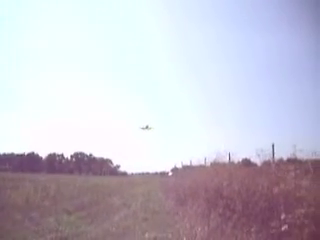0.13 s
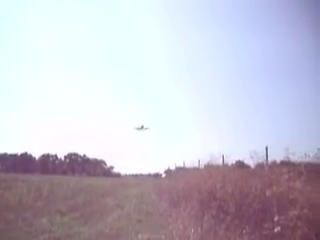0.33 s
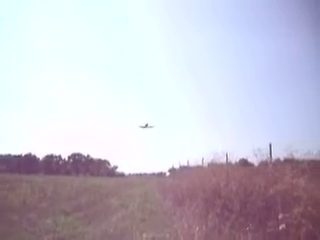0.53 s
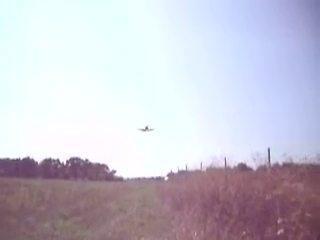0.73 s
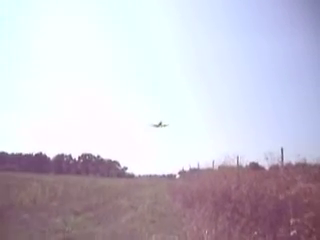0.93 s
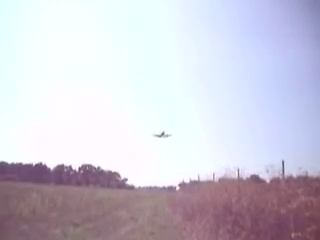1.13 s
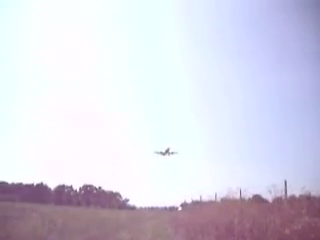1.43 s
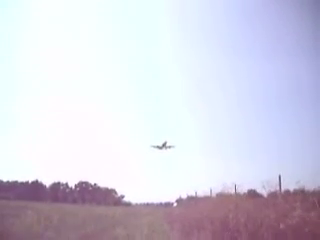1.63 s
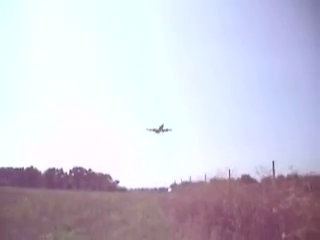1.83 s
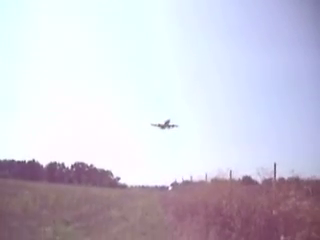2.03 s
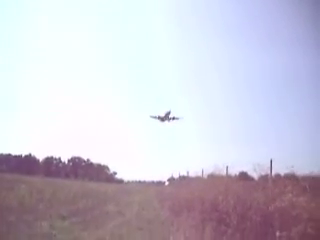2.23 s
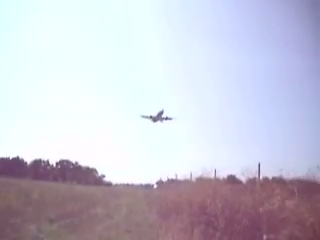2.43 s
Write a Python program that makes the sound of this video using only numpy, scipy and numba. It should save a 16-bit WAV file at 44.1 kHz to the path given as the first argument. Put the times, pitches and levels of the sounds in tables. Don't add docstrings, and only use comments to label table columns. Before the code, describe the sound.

A jet airliner's harsh, broadband roar comes closer over open grass, rumbling and howling, finally distorting.

```python
import sys
import numpy as np
from scipy import signal
from scipy.fft import rfft, irfft
from scipy.io import wavfile
from scipy.ndimage import uniform_filter1d, map_coordinates
from numba import njit

SR = 44100
rng = np.random.default_rng(int(sys.argv[2]) if len(sys.argv) > 2 else 0)


def magnitude_from_level(level_db):
    exponent = np.asarray(level_db, float) / 20
    return 10 ** exponent


def unload_wav(signal):
    wavfile.write(
        sys.argv[1],
        SR,
        np.round(np.clip(np.atleast_2d(signal).T, -1, 1) * 32767).astype(np.int16),
    )


N = 114660


@njit
def resonance(x, hz, width):
    y, swing, store = np.empty(len(x)), 0., 0.
    for i in range(len(x)):
        g = np.tan(np.pi * hz[i] / SR)
        damping = width / hz[i]
        v = (swing + g * (x[i] - store)) / (1 + g * (g + damping))
        swing = 2 * v - swing
        store = store + 2 * g * v
        y[i] = damping * v
    return y


def unit(x):
    return x / np.sqrt(np.mean(x ** 2))


def curve(table, col):
    rows = np.array(table, float)
    return np.interp(np.arange(N) / SR, rows[:, 0], rows[:, col])


def walk(rate):
    hold = int(SR / rate)
    levels = np.repeat(rng.standard_normal(N // hold + 1), hold)
    smooth = uniform_filter1d(uniform_filter1d(levels, hold), hold)
    return 1.3 * smooth[:N]


def band(hz, width):
    x = rng.standard_normal(N)
    for _ in range(2):
        x = resonance(x, hz + np.zeros(N), 1. * width)
    return unit(x)


def coloured(points):
    p = np.array(points, float)
    f = np.arange(N // 2 + 1) * SR / N + 1e-9
    db = np.interp(np.log(f), np.log(p[:, 0]), p[:, 1], left=-200, right=-200)
    return rfft(rng.standard_normal(N)) * magnitude_from_level(db), f


def above(x, hz, width):
    f = np.arange(N // 2 + 1) * SR / N
    return irfft(rfft(x) * np.clip((f - hz) / width + .5, 0, 1), N)


# [t/s, roar level/dB,
# rumble level/dB, treble tilt of the air/dB per octave, howl level/dB, hiss level/dB, low body level/dB]
APPROACH = [(0, -13.5, -21.5, -4.5, -24.5, -34, -8), (.18, -17.5, -22.5, -1.5, -24.5, -37, -4.5),
            (.28, -20.5, -21, 1.5, -27.5, -36, 2.5), (.45, -21, -21.5, -0.5, -33.5, -44, -2),
            (.7, -23.5, -23, 0, -28, -38, 0), (.9, -21, -21.5, 1.5, -26, -43.5, 0),
            (1.1, -22.5, -19.5, 1, -27, -37, 1.5), (1.3, -20.5, -20, 3.5, -31.5, -37, 2.5),
            (1.5, -20.5, -18, 1, -34, -60.5, -4), (1.7, -23, -18, 5, -42, -41.5, 11),
            (1.9, -23.5, -16, 3.56, -36, -29.5, 8), (2.1, -20.5, -16.5, -0.5, -33, -29.5, 1.5),
            (2.3, -20.5, -16, 1, -35, -27.5, 6.5), (2.45, -19, -16, 1, -28, -25, 4),
            (2.6, -14.5, -14.5, 5.5, -31.5, -17.5, 14)]
# [f/Hz, level/dB per Hz]
ROAR_COLOUR = [(120, -34), (200, -11), (363, -5.5), (775, -8), (946, -1.5), (1900, -5.5), (2860, -12),
               (3400, -18), (3900, -19.5), (5070, -51), (8580, -120)]
TILT_HZ, BODY_HZ = 1620, 840
SHIMMER_DB, FLICKER_DB = .7, .6


def roar():
    spectrum, f = coloured(ROAR_COLOUR)
    tilt, body = curve(APPROACH, col=3), curve(APPROACH, col=6)
    out = 0
    for step in np.arange(-10, 6):
        slice_shape = np.clip(1 - np.abs(3 * np.log2(f / TILT_HZ) - step), 0, 1)
        centre_hz = TILT_HZ * 2 ** (step / 3)
        db = tilt * step / 3 + body / (1 + (centre_hz / BODY_HZ) ** 6)
        db = db + SHIMMER_DB * walk(0.83) + FLICKER_DB * walk(12)
        out = out + irfft(spectrum * slice_shape, N) * magnitude_from_level(db)
    return unit(out) * magnitude_from_level(curve(APPROACH, col=1))


# [f/Hz, level/dB per Hz]
RUMBLE_COLOUR = [(13, -36), (22, -18), (54, -3), (118, 2), (211, -7.5), (253, -9.5), (320, -17),
                 (420, -46.5), (700, -120)]


def rumble():
    spectrum, _ = coloured(RUMBLE_COLOUR)
    return unit(irfft(spectrum, N)) * magnitude_from_level(curve(APPROACH, col=2))


def gear_howl():
    hz = 1010 * (1 + 0.025 * walk(2.1))
    return band(hz, 150) * magnitude_from_level(curve(APPROACH, col=4) - 2.5)


# [t/s, centre f/Hz, level/dB]
SLATS = [
    (0, 1900, -23.5),
    (.18, 1900, -32.5),
    (.4, 1930, -46.5),
    (1.8, 1730, -48),
    (2.1, 1640, -41.5),
    (2.3, 1543, -26),
    (2.45, 1346, -21),
    (2.6, 1380, -23),
]


def slat_howl():
    return band(curve(SLATS, col=1), 420) * magnitude_from_level(curve(SLATS, col=2))


# [f/Hz, level/dB, width/Hz]
FAN = [
    (548, -40.5, 55),
    (1063, -36, 16),
    (1600, -43, 33),
    (3490, -55, 42),
]
FAN_SAG_PER_S, FAN_CHANGE_DB_PER_S = 0.0026, -2.5


def fan_tones():
    t = np.arange(N) / SR - 1.3
    out = 0
    for hz, db, width in FAN:
        tone = band(hz * (1 - FAN_SAG_PER_S * t), width)
        out = out + tone * magnitude_from_level(db + FAN_CHANGE_DB_PER_S * t + 0.5 * walk(6.1))
    return out


def inlet_hiss():
    hz = 3250 * (1 + 0.0083 * walk(2.2))
    return band(hz, 710) * magnitude_from_level(curve(APPROACH, col=5) + 0.52 * walk(10))


# [t/s, lag of the lows off soil/ms, their share/0-1,
# lag of the highs off grass tops/ms, their share/0-1]
GROUND = [(0, 0.45, .1, 0.74, 0.083), (.3, .67, .2, .67, 0.25), (.6, .68, .35, .69, 0.54),
          (.9, 0.75, .4, .69, 0.45), (1.15, .74, 0.5, .68, 0.7), (1.35, 0.83, 0.4, .68, 0.55),
          (1.5, 0.78, .6, 0.82, 0.17), (1.7, 0.82, .65, .8, 0.19), (1.9, 0.81, 0.5, .87, 0.49),
          (2.15, .9, 0.6, .93, 0.51), (2.35, 0.82, .5, .98, 0.34), (2.6, .93, 0.3, 1.06, 0.3)]
GRASS_HZ = 1740


def ground_echo(jet):
    wobble = 1 + .01 * walk(6)

    def late(col):
        lag = curve(GROUND, col) * wobble * SR / 1000
        return map_coordinates(jet, [np.arange(N) - lag], mode="mirror")

    soil, tops = late(col=1), late(col=3)
    low_share = np.clip(curve(GROUND, col=2), 0, .95)
    high_share = np.clip(curve(GROUND, col=4), 0, .95)
    lows = soil - above(soil, GRASS_HZ, 700)
    return low_share * lows + high_share * above(tops, GRASS_HZ, 600)


# [t/s, level of the very top/dB]
TOP_LEVEL = [
    (0, 3.5),
    (.45, 3.5),
    (.72, -6),
    (1.0, 2),
    (1.25, -7),
    (1.47, -16),
    (1.65, 7),
    (2.6, 1),
]


def vary_top(x):
    return x + (magnitude_from_level(curve(TOP_LEVEL, col=1)) - 1) * above(x, 3740, 500)


def scene():
    jet = roar()
    heard = jet - ground_echo(jet) + rumble() + gear_howl() + slat_howl() + fan_tones() + inlet_hiss()
    return vary_top(heard)[None]


# [t/s, level/dB, top f/Hz]
TICKS = [(2.0172, -20, 3800), (2.0208, -16.5, 17000), (2.13, -22, 2500), (2.378, -22, 2600),
         (2.42, -57, 20000), (2.4929, -22, 10000), (2.501, -21, 3400), (2.535, -20, 2900),
         (2.546, -44, 16000), (2.574, -20, 3600), (2.5795, -24, 16000)]


def brief_ticks(f):
    return sum(magnitude_from_level(db) * np.exp(-(f / hz) ** 2 - 2j * np.pi * f * s) for s, db, hz in TICKS)


def low_pass(x):
    return signal.sosfilt(signal.butter(12, 15830, fs=SR, output="sos"), x)


# [f/Hz, level/dB]
EDGE = [(3550, 0), (3800, -4.5), (4100, -13), (4350, -24), (4520, -38.5), (4640, -64), (5000, -110)]
SAMPLE_HZ, CEILING = 8000, .75


def record(dry):
    f, t = np.arange(N // 2 + 1) * SR / N, np.arange(N) / SR
    overloaded = CEILING * np.tanh(dry[0] / CEILING)
    kept = irfft(rfft(overloaded) * (f < SAMPLE_HZ / 2), N)
    mirrored = kept * (1 + 2 * np.cos(2 * np.pi * SAMPLE_HZ * t))
    edge_db = np.interp(f, *np.array(EDGE).T)
    mix = irfft(rfft(mirrored) * magnitude_from_level(edge_db) + brief_ticks(f), N)
    return low_pass(mix[None])


dry = scene()
out = record(dry)
unload_wav(out)
```